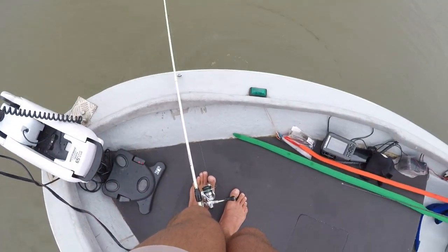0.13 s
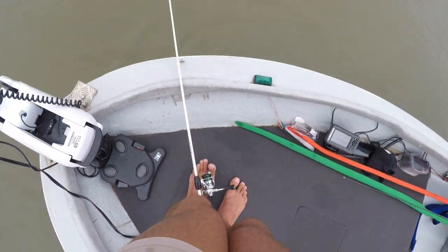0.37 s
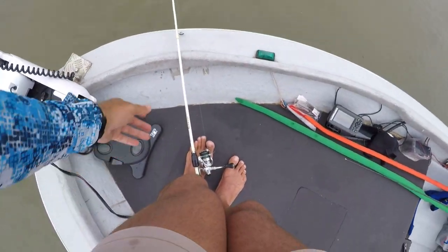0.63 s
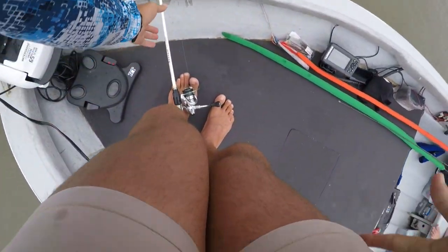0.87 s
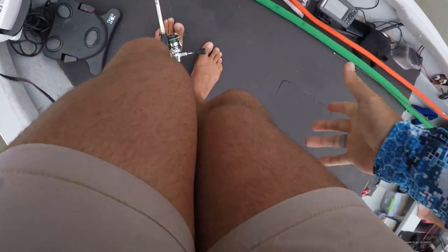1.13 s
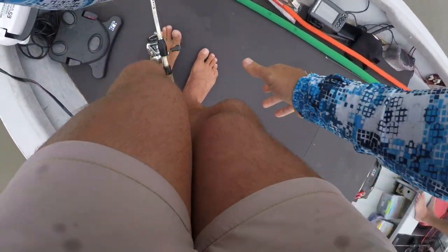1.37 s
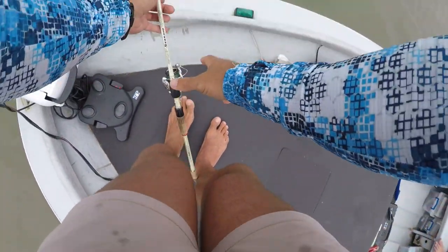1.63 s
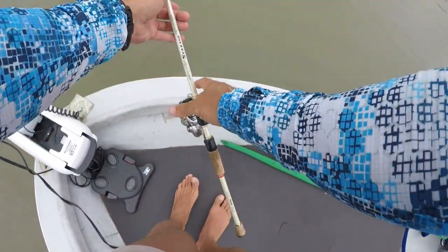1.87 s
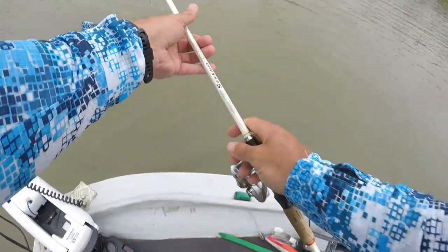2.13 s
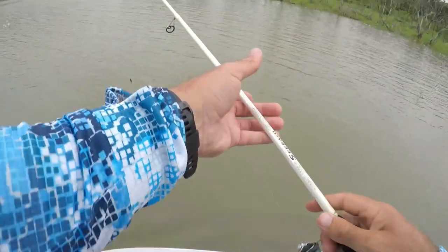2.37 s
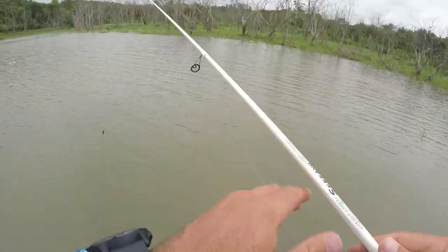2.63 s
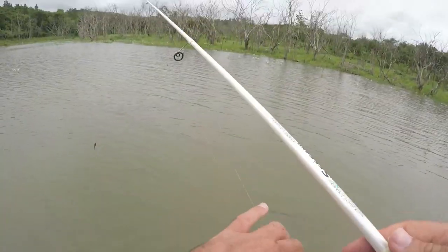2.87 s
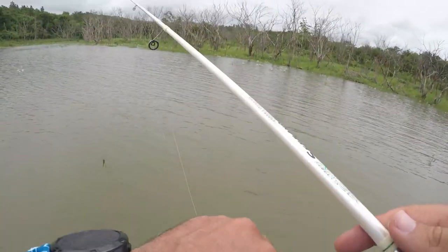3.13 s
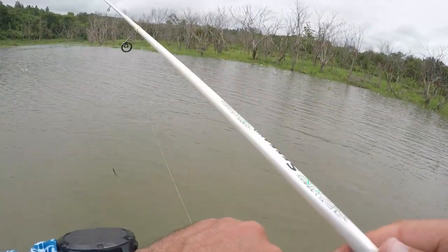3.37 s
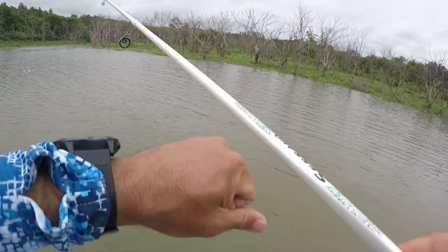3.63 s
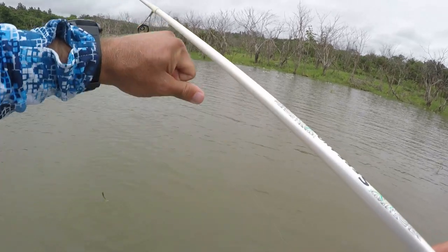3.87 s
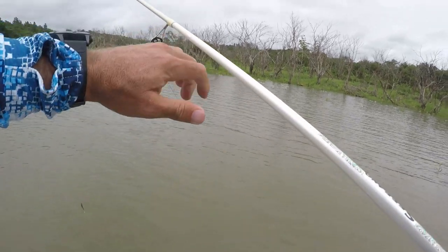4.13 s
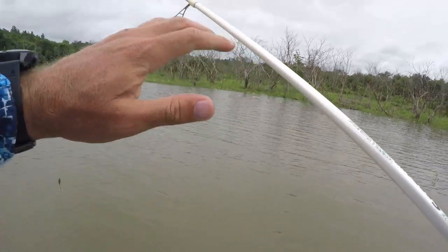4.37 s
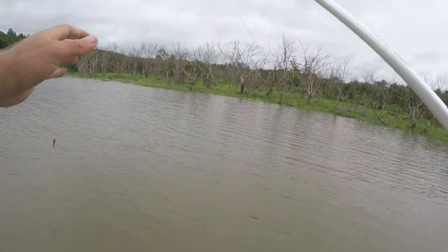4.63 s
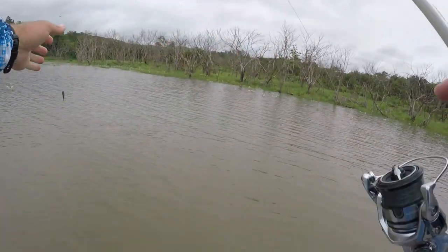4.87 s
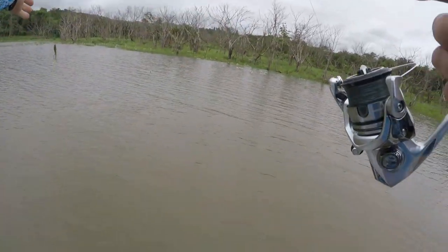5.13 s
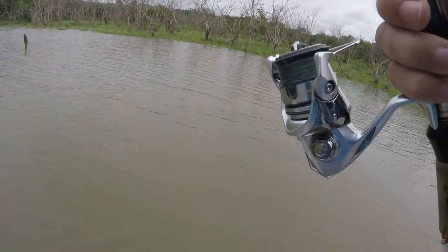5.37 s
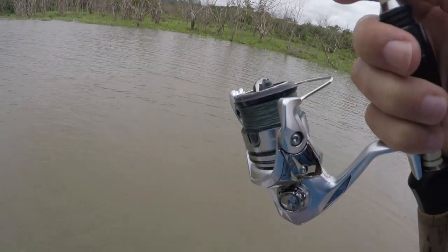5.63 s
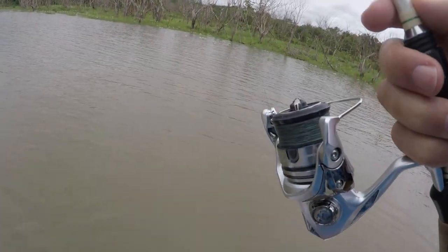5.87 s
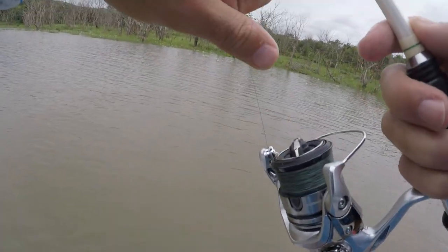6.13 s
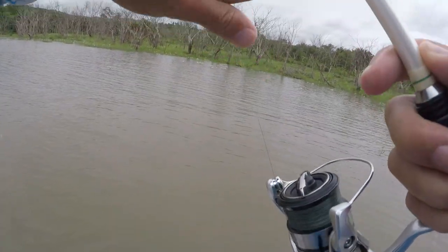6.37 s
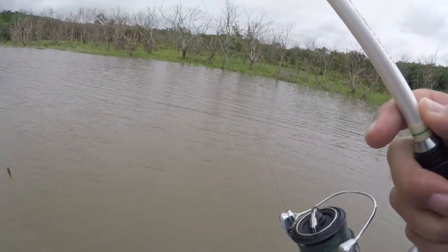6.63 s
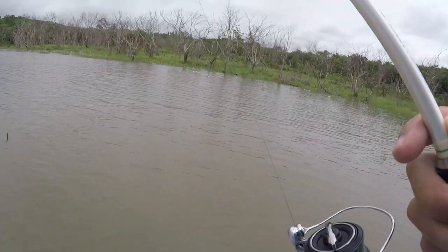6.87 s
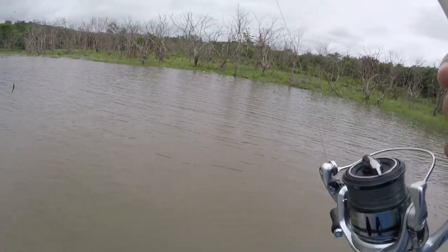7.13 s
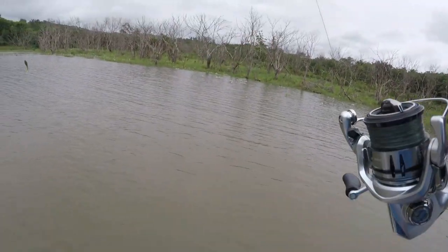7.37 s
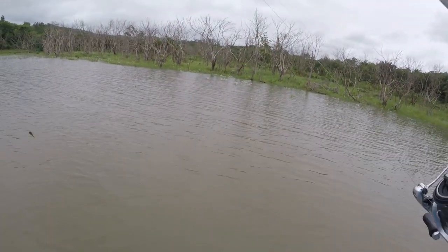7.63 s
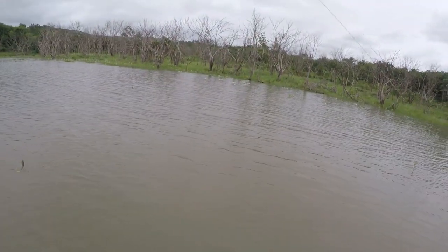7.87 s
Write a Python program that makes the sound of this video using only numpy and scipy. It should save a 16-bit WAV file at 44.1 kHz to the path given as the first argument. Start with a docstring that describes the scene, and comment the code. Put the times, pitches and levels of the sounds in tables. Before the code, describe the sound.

A fishing reel's ratchet whirs twice in quick rising bursts of clicks over strap bumps, low wind, faint water and birds.

```python
"""Fishing reel on open water

Heard at the two ports of a small head-worn camera. Line is pulled twice off a reel: a spring snaps off
each ratchet tooth, faster, then slower, and excites spool modes and long rings. Strap rubbing and bumps
drive housing modes; tackle ticks and a sleeve scrape are banded noise grains. Wind is lumpy low noise
with single puffs; cloth and far water are coloured noise, far birds are gliding near-sines."""
import sys
import numpy as np
from scipy import signal
from scipy.fft import rfft, irfft
from scipy.io import wavfile

SR = 44100
rng = np.random.default_rng(int(sys.argv[2]) if len(sys.argv) > 2 else 0)


def ratio(d):
    """dB to gain"""
    e = np.asarray(d, float) / 20
    return 10 ** e


def materialize(psi):
    """Save the field psi as 16-bit PCM at rate SR to the path in sys.argv[1].

    A 1-D psi becomes a single channel; in a 2-D psi each row is a channel.
    """
    bounded = np.clip(np.atleast_2d(psi).T, -1, 1)
    quanta = np.round(bounded * 32767).astype(np.int16)
    wavfile.write(sys.argv[1], SR, quanta)


N = 353064


def rms_one(x):
    """Scale to unit rms."""
    return x / np.sqrt(np.mean(x ** 2) + 1e-20)


def in_time(rows):
    """Interpolate each column to one value per sample."""
    s, *columns = np.transpose(rows)
    return [np.interp(np.arange(N) / SR, s, c) for c in columns]


def drift(corner_hz):
    """Slow random wander of rms 1: noise through two equal poles, run at SR / 20."""
    r = np.exp(-2 * np.pi * corner_hz * 20 / SR)
    noise = rng.standard_normal(N // 20 + 2002)
    slow = signal.lfilter([1], [1, -2 * r, r * r], noise)[2000:]
    return np.interp(np.arange(N) / 20, np.arange(len(slow)), rms_one(slow))


def resonance(x, hz, width_hz):
    """Two-pole peak of gain 1."""
    r = np.exp(-np.pi * width_hz / SR)
    poles = [1, -2 * r * np.cos(2 * np.pi * hz / SR), r * r]
    return signal.lfilter([(1 - r * r) / 2, 0, (r * r - 1) / 2], poles, x + 1e-18)


def resonance_twice(x, hz, width_hz):
    """Two equal peaks in series: steeper skirts."""
    return resonance(resonance(x, hz, width_hz), hz, width_hz)


def coloured(spectrum):
    """Two unrelated noises with the given spectrum, rms 1 above 1.5 kHz."""
    hz = np.fft.rfftfreq(N, 1 / SR) + 1
    point_hz, point_db = np.transpose(spectrum)
    shape = ratio(np.interp(np.log(hz), np.log(point_hz), point_db, left=-99))
    shape = shape / np.sqrt(np.mean((shape * (hz > 1500)) ** 2))
    return irfft(rfft(rng.standard_normal((2, N))) * shape, N)


def bursts(strikes, decay_s, alike):
    """Every strike rattles as a short dying noise, partly common to both ports."""
    envelope = np.exp(-np.arange(400) / (decay_s * SR))
    noise = rng.standard_normal((3, N))
    mixed = alike * noise[0] + np.sqrt(1 - alike ** 2) * noise[1:]
    return signal.fftconvolve(strikes, envelope)[:N] * mixed


def turning_rattle(strikes, angle, decay_s, alike, count=4):
    """Rattle colour turns with the spool, so neighbouring teeth sound alike."""
    envelope = np.exp(-np.arange(400) / (decay_s * SR))
    noise = rng.standard_normal((count, 3, 400)) * envelope
    noise = alike * noise[:, :1] + np.sqrt(1 - alike ** 2) * noise[:, 1:]
    weights = [np.cos(angle * (.7 + .23 * k) + 2 * np.pi * rng.random()) for k in range(count)]
    spread = np.sqrt(sum(w ** 2 for w in weights))
    return sum(signal.fftconvolve((strikes * w / spread)[None], n)[:, :N] for w, n in zip(weights, noise))


def teeth(pull):
    """Tooth times and click levels: speed summed over time, whole teeth between rows."""
    s, speed, click_db = np.transpose(pull)
    t = np.arange(s[0], s[-1], 1 / SR)
    turned = np.cumsum(np.interp(t, s, speed)) / SR
    at_rows = np.interp(s, t, turned)
    passed = np.r_[0, np.cumsum(np.maximum(np.round(np.diff(at_rows)), 1))]
    tooth_turned = np.interp(np.arange(passed[-1] + 1), passed, at_rows)
    times = np.interp(tooth_turned, turned, t)
    return times, np.interp(times, s, click_db)


# spool modes: (centre [Hz], relative width [Hz], pull 1 left [dB], pull 1 right [dB],
# pull 2 left [dB], pull 2 right [dB], beam direction [rad])
SPOOL_MODES = [(2350, 350, -11, -4, -8.5, -10, 6), (3460, 92, -2, -2, -3.5, -4, -9),
               (5360, 570, -33, 2.5, -22, 4.5, 4), (6210, 830, 0.5, -29, 6, -30, 0.5),
               (7420, 1040, 2, 3.5, -20, 3.5, -9), (9730, 680, -9, 4, -5, -2.5, 8),
               (12740, 67, -3, -37, -21, -2.5, 13), (13800, 3700, -36, -17, -18.5, -31, 5)]


def spool(rattle, k, angle, tooth, click_db):
    """Each mode beams its own way; beams sweep past as the spool turns, each tooth has its own colour."""
    out = np.zeros((2, N))
    for m, (hz, width_hz, *levels_db, beam) in enumerate(SPOOL_MODES):
        colour_db = 1.2 * rng.standard_normal(len(click_db))[tooth.astype(int)]
        turn_db = 1.0 * np.cos(angle - beam) + 2.0 * drift(14) + colour_db
        if hz < 4500:  # frame modes feel less of the swing in click strength
            turn_db -= .75 * np.interp(tooth, np.arange(len(click_db)), click_db - click_db.mean())
        mode = resonance_twice(rattle * ratio(turn_db), hz, 2.32 * width_hz)
        port_db = np.array(levels_db[2 * k:2 * k + 2])[:, None] + 12.0
        out += ratio(port_db) * np.roll(mode, m % 3 * 11, axis=1)  # paths differ in length
    return out


# long spring rings: (frequency [Hz], t60 [s], pull 1 relative level [dB], pull 2 relative level [dB])
SPRING_RINGS = [(6500, 0.2, -39, -50), (6740, 0.13, -46, -29), (3500, .07, -37, -36),
                (5360, 0.034, -47, -45)]


def spring(snaps, k):
    """Each snap excites faint decaying sines of random sign and uneven strength."""
    out = np.zeros((2, N))
    for hz, t60_s, *ring_db in SPRING_RINGS:
        r, w = ratio(-60 / (t60_s * SR)), 2 * np.pi * hz / SR
        uneven = snaps * rng.choice([-1, 1], N) * rng.normal(1.3, .3, (2, N))
        ring = signal.lfilter([0, np.sin(w)], [1, -2 * r * np.cos(w), r * r], uneven + 1e-18)
        out += ratio(ring_db[k] + 1.4 * drift(60)) * ring
    return out


# drag ratchet, one list a pull, a tooth at each row: (time [s], speed [teeth/s], relative click level [dB])
PULLS = [
    [(3.4343, 24, -23), (3.4724, 34, -24.5), (3.5164, 55, -21), (3.5482, 70, -21), (3.5622, 82, -15.5),
     (3.5730, 94, -19), (3.5934, 108, -20.5), (3.6107, 125, -20), (3.6680, 148, -17.5),
     (3.6945, 158, -21.5), (3.7489, 178, -19), (3.7778, 184, -18), (3.7981, 186, -20), (3.8657, 168, -19),
     (3.8783, 152, -17.5), (3.9146, 122, -21), (3.9320, 105, -18), (3.9545, 70, -17.5), (3.9738, 39, -20)],
    [(6.3257, 45, -13), (6.3451, 62, -13), (6.3711, 90, -14), (6.4012, 112, -21), (6.4253, 135, -16),
     (6.4458, 152, -11), (6.4585, 160, -11), (6.4770, 170, -18), (6.4957, 230, -12), (6.5185, 225, -10),
     (6.5363, 222, -21), (6.5625, 225, -10), (6.5806, 215, -19), (6.6005, 195, -13), (6.6168, 170, -12),
     (6.6303, 125, -11), (6.6395, 90, -12), (6.6533, 60, -16)],
]
# per pull: (pull 1 rattle decay [s], pull 2 rattle decay [s])
RATTLE_S = (.0014, .001)
# per pull: (pull 1 clean first contact [gain], pull 2 clean first contact [gain])
CONTACT_GAIN = (1.2, 1.5)
# tooth at spool angle zero: (pull 1 [tooth number], pull 2 [tooth number])
FACING_TOOTH = (5, 11.5)


def ratchet(scatter_db=1.2, rebound_s=0.001374, rebound_db=-9, late_s=.0005, teeth_per_sweep=12):
    """The spring snaps off each tooth, rebounds once, rattles the spool and rings on faintly."""
    out = np.zeros((2, N))
    for k, pull in enumerate(PULLS):
        s, click_db = teeth(pull)
        snaps = np.zeros(N)
        snaps[((s + late_s) * SR).astype(int)] = ratio(click_db + scatter_db * rng.standard_normal(len(s)))
        strikes = snaps + ratio(rebound_db) * np.roll(snaps, int(rebound_s * SR))
        tooth = np.interp(np.arange(N) / SR, s, np.arange(len(s)))
        angle = 2 * np.pi * (tooth - FACING_TOOTH[k]) / teeth_per_sweep
        rattle = .3 * turning_rattle(strikes, angle, RATTLE_S[k], alike=.85)
        rattle += .25 * bursts(strikes, RATTLE_S[k], alike=.85)
        # loose parts buzz evenly
        rattle += ratio(click_db.mean() - 21) * bursts(1. * (snaps > 0), decay_s=.005, alike=0.7)
        rattle += CONTACT_GAIN[k] * strikes
        rattle[1] = np.roll(rattle[1], 2)  # the reel is a little to one side
        out += spool(rattle, k, angle, tooth, click_db) + spring(snaps, k)
    return out


# bumps: (time [s], relative dull level [dB], relative bright level [dB], relative left-right balance [dB],
# hardness in the dull modes [dB/octave])
BUMPS = [(0.145, -24, -31, -16, 4), (0.217, -37, -41, -1, 11), (0.382, -20, -37, -9, -27),
         (0.438, -18.5, -17, -3.5, 10.5), (0.592, -19.5, -16, -12.5, -50), (0.612, -17, -35, -12, -12),
         (0.7959, -12.5, -40, -14, 10.5), (0.908, -16.5, -31, 0.5, -53), (1.1105, -15, -18, -9.5, -0.5),
         (1.209, -28.5, -21, -5, 14), (1.523, -19.5, -23, -9, -2), (1.705, -18.5, -39, -11, -7),
         (2.276, -21, -20, -12, -8), (2.719, -23, -15, -12, -19), (2.732, -28.5, -17.5, 8, 14.5),
         (2.812, -31, -36, 10, -4), (2.849, -23, -22, -4, 6), (2.998, -24.5, -15.5, -6, -37),
         (3.271, -27.5, -45, -4.5, 3), (3.409, -27, -41, -13, 2), (3.549, -32, -49, -18, 11.5),
         (3.71, -12, -14, -8, 1), (3.961, -18.5, -21, -8, -3), (4.029, -37.5, -44, 0, 10.5),
         (4.055, -28.5, -24, -7, 10.5), (4.294, -35.5, -40, -8, 14), (4.374, -44, -51, 11, 16.5),
         (5.526, -20.5, -25, -10.5, 5.5), (5.882, -29.5, -49, -13, 6.5), (6.601, -29.5, -45, 14, 4),
         (6.613, -29.5, -38, 2, 7.5), (6.621, -36, -40, 0, 7), (6.664, -34, -56, 10, 5),
         (6.695, -31.5, -42, -11, 11)]


def housing(modes, rub, push_db, hardness_db, push_s, top_db=0):
    """Rubbing and bumps travel through the shell; bending modes move the two ports in opposition."""
    s, pan_db = np.array(BUMPS)[:, 0], np.array(BUMPS)[:, 3]
    push = np.hanning(int(push_s * SR) + 3)
    out = np.zeros((2, N))
    for hz, width_hz, left_db, right_db, alike in modes:
        alike = np.clip(alike, -1, 1)
        rub_db = 1.2 * drift(6) + top_db * (hz == modes[-1][0])
        common, own = rng.standard_normal((2, N)) * rub * ratio(rub_db)
        rubbing = np.array([alike * common + np.sqrt(1 - alike ** 2) * own, common])
        knock_db = push_db + hardness_db * np.log2(hz / modes[1][0])
        knocks = np.zeros((2, N))
        knocks[:, (s * SR).astype(int)] = ratio(knock_db + np.outer([.5, -.5], pan_db + 7))
        knocks = signal.lfilter(push / push.sum(), [1], knocks) * [[np.sign(alike)], [1]]
        out += ratio([[left_db], [right_db]]) * resonance_twice(rubbing + knocks, hz, width_hz)
    return out


# housing modes: (centre [Hz], width per peak [Hz], left [dB], right [dB], left-right likeness, clipped to +-1)
DULL_MODES = [(132, 57.4, 6, 21.5, -0.77), (170.5, 87, 19.5, 26.5, -0.73), (306.3, 107, 14.5, 19, 0.89),
              (483, 179, 10, 7.5, -0.089), (645, 230, -7.5, -7.5, 0.73)]
# same columns: (centre [Hz], width per peak [Hz], left [dB], right [dB], left-right likeness, clipped to +-1)
BRIGHT_MODES = [(523, 470, 20.14, 17, -1.005), (734, 41, 24.3, 26, -1.03), (913, 73, 29.1, 29.5, -1.1),
                (1284, 930, 15.1, 16, -0.76), (2300, 340, 7.4, 8, -0.62), (3240, 1440, 0.13, -2, 1)]
# strap rubbing: (time [s], relative dull level [dB], relative bright level [dB])
RUBBING = [(0, -40.5, -48), (.22, -28, -43.5), (.4, -28.5, -40), (.55, -26, -37.5), (.9, -25, -39.5),
           (1.02, -34, -48), (1.3, -36, -49), (1.5, -34, -48), (1.6, -33.5, -42.5), (1.9, -27.5, -43.5),
           (2.03, -35, -46.5), (2.3, -26.5, -39), (2.45, -28.5, -40), (2.6, -33.5, -44.5),
           (2.8, -27.5, -45.5), (2.9, -45, -50), (3.0, -33.5, -46.5), (3.2, -44, -54.5), (3.6, -46.5, -48),
           (3.72, -40, -48), (4.4, -37.5, -48.5), (4.5, -53, -53.5), (4.72, -48, -57.5), (5.1, -31.5, -45),
           (5.35, -33, -46), (5.5, -38, -53.5), (5.62, -30.5, -47), (5.8, -45, -54.5), (5.95, -36.5, -50.5),
           (6.15, -50, -56), (6.35, -41, -49), (6.5, -46, -43), (6.62, -36, -40), (6.8, -48, -53),
           (6.89, -41.5, -52), (6.93, -37, -51), (7.04, -39, -49.5), (7.08, -59, -55), (7.3, -42.5, -52.5),
           (7.5, -52.5, -54.5), (7.65, -42.5, -52.5), (7.85, -49.5, -56), (8.01, -57, -55)]
# rubbing in the highest dull mode against the others: (time [s], level [dB])
UPPER_DULL = [(0, 5), (1.0, 2), (1.75, -10), (1.95, -11), (2.2, 8), (2.45, 10.5), (2.7, 6), (3.0, 8),
              (3.6, -17), (4.4, 8), (5.2, -8), (6, 3), (7.0, 12), (7.3, 10), (8.01, 17)]


def handling():
    """Strap stick-slip comes in lumps; each bump is one soft push, harder ones favour higher dull modes."""
    dull_db, bright_db = in_time(RUBBING)
    lumps_db = 2.0 * drift(12.3) + 1.19 * drift(59)
    _, bump_dull_db, bump_bright_db, _, hardness_db = np.transpose(BUMPS)
    dull = housing(DULL_MODES, ratio(dull_db + lumps_db), bump_dull_db + 26.0, hardness_db,
                   push_s=0.0024, top_db=in_time(UPPER_DULL)[0])
    bright = housing(BRIGHT_MODES, ratio(bright_db + .5 * lumps_db), bump_bright_db + 14.5, -4.0, push_s=0.0007)
    return dull + bright


# sharp ticks from rod and tackle: (time [s], relative level [dB], centre [Hz])
TICKS = [(0.1028, -30, 2830), (.155, -24, 2350), (0.216, -28, 1210), (.439, -23.5, 1320),
         (0.446, -20, 1490), (0.5896, -31, 2940), (.7995, -26, 600), (1.113, -25.5, 560),
         (1.114, -32, 2300), (1.12, -33, 3320), (1.211, -32, 1020), (1.8073, -36, 5540),
         (2.718, -25.5, 700), (2.733, -18, 1110), (2.733, -14.5, 3280), (2.746, -29, 2000),
         (2.813, -32.5, 1240), (2.997, -40, 3610), (3.075, -40, 2640), (3.408, -40, 700),
         (3.424, -42, 2500), (5.5235, -37, 3240), (5.528, -29, 1380), (5.922, -40, 6460), (7.624, -65, 695),
         (7.728, -41, 6700), (7.755, -41, 5000), (7.784, -39, 6700), (7.8082, -40, 4200),
         (7.835, -41, 2900), (7.929, -35.5, 750), (7.9775, -34, 5540)]


def ticks():
    """A short rattle in a band around each tick's own pitch; low ones last longer."""
    out = np.zeros((2, N))
    for s, level_db, hz in TICKS:
        at = int(s * SR)
        rattle = rng.standard_normal((2, 600)) * np.exp(-np.arange(600) / SR * hz / 7.5)
        rattle[1] = .8 * rattle[0] + .6 * rattle[1]
        band = resonance_twice(rattle, hz, 0.49 * hz) * np.sqrt(3000 / hz)
        treble = 0.066 * resonance_twice(rattle, 5200, 2800)
        out[:, at:at + 600] += ratio(level_db + 7.0) * (band + treble)
    return out


# sleeve over the rod: (loudest time [s], level [dB], rise [dB/s], fall [dB/s])
DRAGS = [(0.159, -37, 298, 400), (.44, -42, 2500, 350), (.715, -46, 400, 400)]


def scrape():
    """A sleeve drags over the rod: dense grains in one broad band."""
    grains = (rng.random(N) < 1500 / SR) * ratio(2.1 * np.minimum(rng.exponential(1, N), 4))
    rough = resonance(bursts(grains, decay_s=0.00084, alike=0.24), 3200, 780)
    t = np.arange(N) / SR
    swell = np.zeros(N)
    for s, db, rise, fall in DRAGS:
        below_db = np.maximum(rise * (s - t), fall * (t - s))
        swell += ratio(db - np.minimum(below_db, 99))
    return rms_one(rough) * swell


# wind on the ports: (time [s], relative level [dB])
WIND = [(0, -42), (.3, -38.5), (.4, -34), (.5, -45), (.6, -28), (.72, -41), (.9, -30.5), (1.05, -39.5),
        (1.18, -30), (1.22, -27), (1.3, -28.5), (1.45, -39.5), (1.5, -33), (1.55, -29), (1.85, -28.5),
        (1.93, -21), (2.02, -33), (2.1, -29.5), (2.2, -33), (2.45, -28.5), (2.7, -32.5), (3.3, -43),
        (3.5, -41.5), (3.8, -50), (4.0, -49), (4.4, -53.5), (4.7, -67), (5.2, -62), (6.1, -75), (6.6, -72),
        (7.2, -80), (8.01, -85)]


def wind(opposed=0.45, lumps_db=3.5):
    """Lumpy low pressure, stronger on the right, partly in opposition at the two ports."""
    band = signal.butter(3, [30, 125], "band", fs=SR, output="sos")
    low = signal.sosfilt(band, rng.standard_normal((2, N)))
    low = low + 0.5 * resonance(low, 132, 44)  # the ports boom a little
    low[0] -= opposed * low[1]
    port_db = np.array([lumps_db * drift(17) - 3, lumps_db * drift(7.2) + 6.0])
    return rms_one(low) * ratio(in_time(WIND)[0] + port_db)


# wind puffs, stronger on the right: (start [s], right peak [dB], nominal length [s])
PUFFS = [(0.804, 3.5, 0.0026), (1.2134, -17, 0.0042), (1.233, -10.5, 0.0091), (1.531, -10.5, 0.0079),
         (1.705, -15, 0.012), (1.812, -11, 0.0094), (1.997, -11, 0.0091), (2.07, -8, 0.0084),
         (2.103, -13, 0.006)]


def puffs(left_db=-12):
    """Each puff is one dip of pressure between two small swells."""
    t = np.arange(N) / SR
    out = np.zeros(N)
    for s, peak_db, length_s in PUFFS:
        u = np.clip((t - s - length_s / 2) * np.pi / length_s, -9, 9)
        out += ratio(peak_db) * (u ** 2 - 1) * np.exp(-u ** 2 / 2)
    return out * ratio([[left_db], [0]])


# cloth: (time [s], relative level [dB])
RUSTLE = [(0, -60), (.1, -51.5), (.19, -43), (.24, -60.5), (.55, -58), (.8, -52.5), (1.05, -59),
          (1.8, -60.5), (2.1, -64.5), (2.4, -58.5), (2.8, -67), (5, -68), (5.3, -65), (7.6, -70),
          (7.8, -64), (8.01, -65)]
# cloth spectrum: (frequency [Hz], relative density [dB per Hz])
CLOTH_SPECTRUM = [(1200, 7.5), (2500, 4), (4000, -7), (7000, 2.5), (9000, -6.5), (13000, -26)]


def cloth():
    """Rustle: coloured noise with a followed, wandering level."""
    level_db = in_time(RUSTLE)[0] + 1.7 * drift(23)
    return ratio(level_db + np.array([[4.5], [7.5]])) * coloured(CLOTH_SPECTRUM)


# whistles: (start [s], length [s], first pitch [Hz], last pitch [Hz], relative level [dB])
BIRDS = [(0.11, .03, 4420, 5970, -47), (0.131, .016, 5950, 6160, -47), (1.344, 0.011, 5600, 6630, -48.5),
         (1.351, 0.018, 6150, 4850, -49), (1.366, 0.012, 4880, 4760, -52), (1.367, .023, 7800, 7000, -54),
         (1.835, 0.023, 4500, 5600, -51), (3.274, 0.045, 3100, 2420, -60), (4.006, 0.025, 4000, 4300, -57),
         (4.039, .02, 4370, 5560, -55), (4.057, 0.015, 5750, 5600, -57), (4.069, 0.011, 5230, 4630, -60),
         (4.307, .012, 2300, 2600, -54), (4.33, 0.022, 2800, 3440, -55), (4.34, 0.061, 3330, 3920, -52),
         (4.398, 0.011, 3860, 4420, -54), (4.425, 0.022, 3900, 2870, -48), (4.44, .018, 2900, 2650, -61),
         (4.458, 0.03, 2700, 3940, -52), (4.487, 0.03, 3850, 3950, -59), (4.509, 0.013, 3940, 3480, -54),
         (4.999, 0.016, 3460, 2900, -53), (5.028, 0.022, 3900, 3000, -55), (5.083, .018, 3600, 4500, -63),
         (5.119, 0.023, 3750, 2500, -47), (5.168, 0.017, 3000, 3770, -48), (5.184, .018, 3750, 4800, -56),
         (5.223, 0.015, 3800, 3000, -48), (5.23, 0.021, 3250, 2500, -49), (5.28, .015, 4320, 5000, -59),
         (5.308, 0.025, 5000, 4220, -61), (5.403, 0.024, 3580, 2260, -52), (5.415, 0.041, 6100, 6950, -56),
         (5.437, 0.053, 6950, 7060, -53), (5.413, 0.049, 4680, 5400, -58), (5.458, 0.055, 5340, 5730, -54),
         (5.444, 0.099, 2300, 3040, -60), (5.447, 0.017, 2900, 3700, -56), (5.496, 0.045, 4000, 3230, -54),
         (5.54, 0.017, 3270, 3160, -54), (5.552, 0.0164, 3130, 2500, -53), (5.6, 0.02, 2500, 2700, -53),
         (5.615, 0.056, 2770, 2820, -55), (5.838, .09, 2840, 3340, -61.5), (6.17, 0.094, 2820, 2510, -61),
         (6.27, 0.033, 2550, 2600, -61), (6.71, 0.014, 3150, 3150, -51.5)]


def birds(straight_note_s=0.054, arch_per_s=3.3):
    """Near-sine glides, long ones arched, short ones sagging, softly faded, with a short echo off the water."""
    out, waver_hz = np.zeros(N), 22 * drift(30)
    for start, length_s, first_hz, last_hz, level_db in BIRDS:
        at, size = int(start * SR), int(length_s * SR)
        u = np.linspace(-1, 1, size)
        arch_hz = abs(last_hz - first_hz) * arch_per_s * (length_s - straight_note_s)
        glide_hz = first_hz + (last_hz - first_hz) * (1 + u) / 2
        hz = glide_hz + arch_hz * (1 - u ** 2) + waver_hz[at:at + size]
        out[at:at + size] += ratio(level_db) * (1 - u ** 2) ** 0.42 * np.sin(2 * np.pi * np.cumsum(hz) / SR)
    out = out * ratio(2.0 * drift(35))
    tail = rng.standard_normal((2, 3500)) * np.exp(-np.arange(3500) / (.025 * SR))
    blur = ratio(-32) * signal.fftconvolve(out[None], tail)[:, :N]  # scattered by the trees on the bank
    echo = 0.4 * np.array([np.roll(out, 900), np.roll(out, 1300)])
    return blur + np.array([1.84 * out, out]) + echo


# far water spectrum: (frequency [Hz], relative density [dB per Hz])
WATER_SPECTRUM = [(53, -72), (90, -84), (154, 4), (294, -1.5), (328, -3), (407, -8.5), (828, -16),
                  (1250, -24.5), (1450, -26), (9860, -27.5), (15500, -46.5)]


def far_water():
    """Steady coloured noise, a little stronger on the right."""
    return ratio([[-58.5], [-57.0]]) * coloured(WATER_SPECTRUM)


def scene():
    """Everything at the two ports; all but wind and puffs is low-cut."""
    rest = ratchet() + handling() + ticks() + scrape() + cloth() + birds() + far_water()
    low_cut = signal.butter(8, 132.4, "high", fs=SR, output="sos")
    return signal.sosfilt(low_cut, rest) + wind() + puffs()


def low_pass(x):
    """Removes everything above the highest recorded frequency."""
    return signal.sosfilt(signal.butter(12, 16520, fs=SR, output="sos"), x)


def record(dry):
    """Peaks are rounded by tanh, then the top is cut at 15.2 kHz."""
    rounded = 0.86 * np.tanh(dry / 1.085)
    mix = signal.sosfilt(signal.butter(10, 15200, fs=SR, output="sos"), rounded)
    return low_pass(mix)


dry = scene()
out = record(dry)
materialize(out)
```